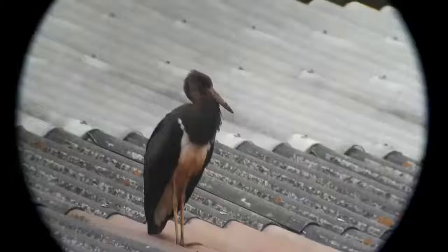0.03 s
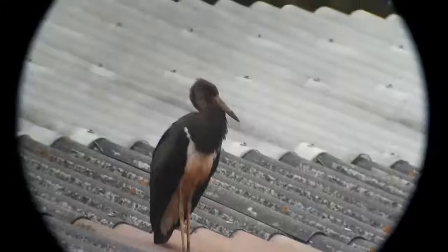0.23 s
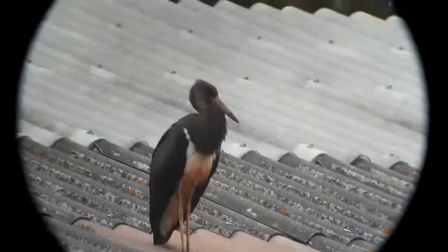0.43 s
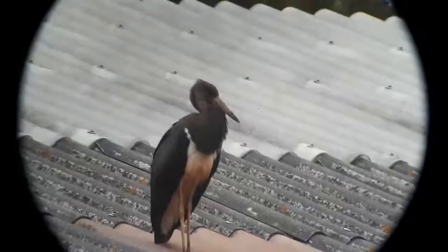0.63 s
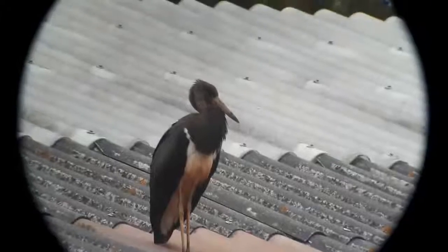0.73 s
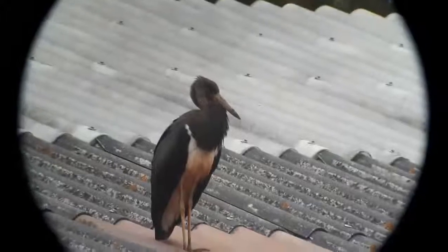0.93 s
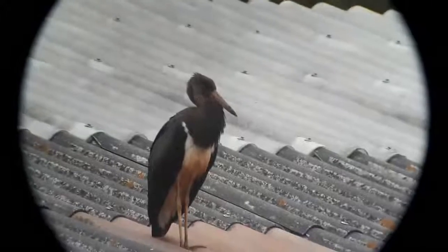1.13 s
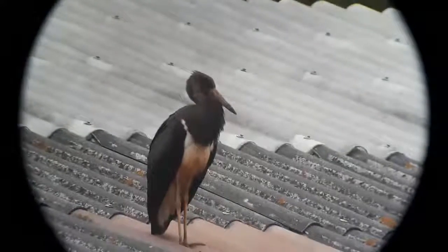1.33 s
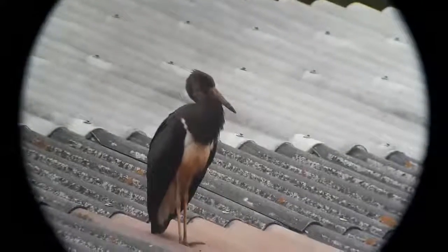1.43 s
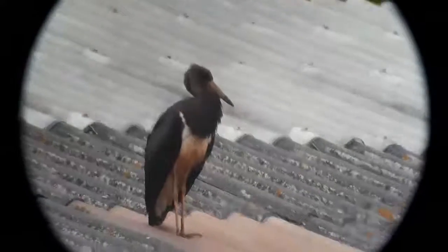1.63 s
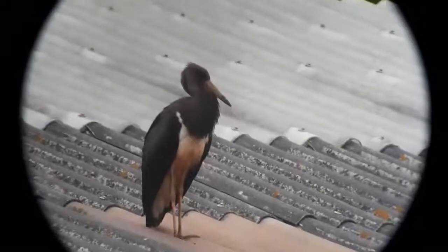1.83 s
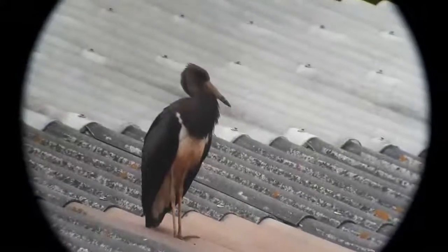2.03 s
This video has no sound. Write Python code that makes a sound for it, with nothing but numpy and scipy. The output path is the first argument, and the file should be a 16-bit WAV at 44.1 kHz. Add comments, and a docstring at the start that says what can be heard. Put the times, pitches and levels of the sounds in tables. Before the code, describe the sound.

A small motor, like a vibrating phone, hums softly close to the microphone, turns briefly buzzy and stops after about a second. Faint outdoor hiss and a distant idling engine lie behind, with soft wind bumps midway.

```python
"""Quiet farmyard with a small motor

A hand-held microphone stands in an even hiss of air, with an engine idling in the distance.
Close by, a small motor, likely a phone's vibrator, spins up, hums for a second and stops.
Soft low bumps of wind or handling reach the microphone midway; one tiny tick comes near the end."""
import sys
import numpy as np
from scipy import signal
from scipy.fft import rfft, irfft
from scipy.io import wavfile
from scipy.ndimage import uniform_filter1d

SR = 44100
rng = np.random.default_rng(int(sys.argv[2]) if len(sys.argv) > 2 else 0)


def inscribe(sig):
    """Save sig as 16-bit PCM at rate SR to the path in sys.argv[1].

    A 1-D sig is mono; a 2-D sig holds one channel per row.
    Samples are clipped to [-1, 1] before scaling.
    """
    pcm = np.round(np.clip(np.atleast_2d(sig).T, -1, 1) * 32767)
    wavfile.write(sys.argv[1], SR, pcm.astype(np.int16))


N = 92610
T = np.arange(N) / SR


def amp(db):
    """Decibels to gain."""
    return 10 ** (np.asarray(db) / 20)


def unit_rms(x):
    """Scales to rms 1."""
    return x / np.sqrt(np.mean(x ** 2) + 1e-20)


def over_time(points):
    """Joins (time_s, value) points by straight lines."""
    return np.interp(T, *np.transpose(points))


def over_frequency(points, hz):
    """Reads (frequency_hz, value) points on a log-frequency axis."""
    point_hz, value = np.transpose(points)
    return np.interp(np.log(hz + 1), np.log(point_hz), value)


def pan(left_minus_right_db):
    """Left and right gains for a level difference."""
    return amp(np.array([[.5], [-.5]]) * left_minus_right_db)


def drift(rate_hz):
    """Smooth random wander of rms 1."""
    hz = np.fft.rfftfreq(N, 1 / SR)
    white = rfft(rng.standard_normal(N))
    return unit_rms(irfft(white * (hz > 0) * np.exp(-(hz / rate_hz) ** 2), N))


# How alike the air is on the two sides of the microphone: frequency_hz, correlation
AIR_CORRELATION = [(60, 0.5), (140, 1), (290, 0.8), (640, 0.58), (1400, 0.08), (3100, 0), (6800, .25),
                   (15000, 0.1)]
# How far the air leans to the left: frequency_hz, left_minus_right_db
AIR_BALANCE = [(60, 1.8), (200, 1.7), (380, 1.2), (700, 6.4), (1300, 5.5), (2400, 5.4), (4400, 4.4),
               (8100, 0.27), (15000, .3)]

def air_noise(spectrum, patch_db=2):
    """Stereo noise of rms 1 in a given colour, with drifting patches, nearly mono in the upper bass."""
    hz = np.fft.rfftfreq(2048, 1 / SR)
    shape = (N // 512 + 5, len(hz))  # frames, bands
    patches = uniform_filter1d(rng.standard_normal(shape), size=7, axis=0)
    patches = unit_rms(uniform_filter1d(patches, size=14, axis=1))
    left, unrelated = rng.standard_normal((2, *shape)) + 1j * rng.standard_normal((2, *shape))
    correlation = np.clip(over_frequency(AIR_CORRELATION, hz), -1, 1)
    right = correlation * left + np.sqrt(1 - correlation ** 2) * unrelated
    colour = amp(over_frequency(spectrum, hz) + patch_db * patches)
    balance = pan(over_frequency(AIR_BALANCE, hz))[:, None]
    frames = np.array([left, right]) * colour * balance
    _, noise = signal.istft(frames.swapaxes(1, 2), nperseg=2048, noverlap=1536)
    return unit_rms(noise[:, :N])


# Low wash, midrange rustle and hiss of the open yard: frequency_hz, relative_density_db
WASH_SPECTRUM = [(20, -45), (33, -21), (48, -8), (75, -10), (125, -6), (190, -11), (240, -10.5),
                 (310, -16.5), (430, -20), (600, -17.5), (830, -16), (1200, -20), (1600, -27.5),
                 (2500, -34.5), (5000, -79)]
RUSTLE_SPECTRUM = [(400, -34), (1000, -11.5), (1450, -8), (1900, 0.5), (2450, -7), (3200, -4.5),
                   (6000, -15), (15000, -52)]
HISS_SPECTRUM = [(300, -11.5), (1200, -4), (1900, -2), (2450, -5), (3100, 0), (4300, 1), (5100, -3),
                 (5700, -12.5), (7600, -11.5), (8400, -20.5), (13000, -17.5), (15500, -20)]
# The breeze swelling the wash: time_s, gain_db
BREEZE_SWELL = [(.18, 3), (.5, 4.5), (.75, 4.5), (.95, 5.5), (1.2, 2.5), (1.48, 4.5), (1.6, -1), (2.1, 1)]
# The rustle dying down: time_s, level_db
RUSTLE_LEVEL = [(.18, -63), (.35, -60), (.95, -61), (1.2, -62.5), (1.5, -62.5), (1.57, -68), (2.1, -69.5)]

def yard_air():
    """All around the microphone: a low wash that swells with the breeze, a rustle and an even hiss."""
    wash = amp(-60 + over_time(BREEZE_SWELL)) * air_noise(WASH_SPECTRUM)
    rustle = amp(over_time(RUSTLE_LEVEL)) * air_noise(RUSTLE_SPECTRUM)
    hiss = amp(-60.5) * air_noise(HISS_SPECTRUM, patch_db=1.3)
    return wash + rustle + hiss


# Engine tones heard from far off: firing_multiple, base_level_db
ENGINE_ORDERS = [(1, -76.5), (2, -60.5), (3, -61.5), (4, -77)]
# Rise and fall of the whole engine at the microphone: time_s, gain_db
ENGINE_SWELL = [(.2, -6), (.35, 4.5), (.44, 0), (.52, -7), (.69, -11), (.77, 2.5), (1.17, -1.5),
                (1.32, -0.5), (1.49, -0.5), (1.57, -4), (1.79, 2), (1.91, 6), (1.98, -4), (2.1, -3.5)]

def distant_engine():
    """An idling engine: only the lowest firing orders carry this far, each fading in and out."""
    firing_hz, jitter, fade_db = 48.92, 0.017, 4
    phase = 2 * np.pi * np.cumsum(firing_hz * (1 + jitter * drift(rate_hz=7.4))) / SR
    orders = np.zeros(N)
    for multiple, db in ENGINE_ORDERS:
        level = amp(db + fade_db * drift(rate_hz=5))
        orders += level * np.sin(multiple * phase + 2 * np.pi * rng.random())
    return pan(2.5) * amp(over_time(ENGINE_SWELL)) * orders


# Turning speed of the motor: time_s, rotation_hz
MOTOR_SPEED = [(.18, 169.7), (.25, 172.2), (.36, 183.2), (.55, 181.8), (.88, 181.8), (.99, 185.1),
               (1.07, 184.7), (1.13, 183.5), (1.38, 181.3)]
# Its hum, close to the microphone: time_s, level_db
HUM_LEVEL = [(.18, -55), (.26, -53.5), (.35, -48), (.41, -43), (.46, -44.5), (.55, -43), (.63, -48.5),
             (.70, -48), (.79, -42), (.92, -43), (1.04, -46), (1.15, -44), (1.27, -43.5), (1.355, -47),
             (1.38, -61), (1.40, -87)]
# Overtones of its casing: rotation_multiple, level_re_hum_db, change_at_full_buzz_db
CASING_OVERTONES = [(2, -28, -1), (3, -32, -0.5), (4, -29.5, 15), (6, -40, 9), (7, -39.5, 12),
                    (9, -43.5, 12)]

def small_motor():
    """Close by, an off-centre weight shakes its casing: a near-pure hum that turns buzzy midway."""
    jitter, hum_wobble_db, overtone_wobble_db = 0.0041, 1.17, 1.5
    buzz_peak_s, rise_s, fall_s = 1, 0.096, 0.23
    rotation_hz = over_time(MOTOR_SPEED) * (1 + jitter * drift(rate_hz=35))
    phase = 2 * np.pi * np.cumsum(rotation_hz) / SR
    buzz_width_s = np.where(T < buzz_peak_s, rise_s, fall_s)
    buzz = np.exp(-((T - buzz_peak_s) / buzz_width_s) ** 2)
    overtones = np.zeros(N)
    for multiple, db, buzz_db in CASING_OVERTONES:
        gain = amp(db + buzz_db * buzz + overtone_wobble_db * drift(rate_hz=18))
        overtones += gain * np.sin(multiple * phase)
    level = np.sqrt(2) * amp(over_time(HUM_LEVEL) + hum_wobble_db * drift(rate_hz=48))
    return level * (pan(1.7) * np.sin(phase) + pan(5.5) * overtones)


# Bumps right on the microphone: centre_s, peak_db, pitch_hz, half_length_s, left_minus_right_db
MICROPHONE_BUMPS = [(0.205, -50, 107, .008, -12), (0.734, -52, 62.1, 0.011, 8),
                    (0.851, -43.5, 99, 0.0096, 9), (0.879, -45.5, 62, 0.014, 9),
                    (0.955, -35, 98.1, 0.0074, 17), (.992, -47, 88, 0.0073, -16),
                    (1.031, -48.5, 63.4, 0.01, -17), (1.087, -53.5, 88, 0.011, -22)]
# Rumble of the gust around them: frequency_hz, relative_density_db
GUST_SPECTRUM = [(20, -32), (45, -5.5), (80, -6), (130, -3), (250, -10.5), (450, -23.5), (900, -24.5),
                 (1400, -26), (2500, -44), (6000, -80)]

def microphone_buffets():
    """Wind or handling at the microphone: soft pressure bumps of a cycle or two, and a brief rumble."""
    bumps = np.zeros((2, N))
    for centre_s, peak_db, pitch_hz, half_length_s, side_db in MICROPHONE_BUMPS:
        t = T - centre_s
        envelope = amp(peak_db) * np.exp(-(t / half_length_s) ** 2)
        bumps -= pan(side_db) * envelope * np.cos(2 * np.pi * pitch_hz * t)
    gust_peak_s, gust_width_s = 0.933, 0.17
    gust = amp(-53.5) * np.exp(-((T - gust_peak_s) / gust_width_s) ** 2)
    return bumps + pan(7) * gust * air_noise(GUST_SPECTRUM)


# Resonances of the tapped plastic: pitch_hz, peak_db, t60_s
PLASTIC_MODES = [(750, -50, .012), (1750, -47, .008), (2800, -51, .006), (4400, -57, .02),
                 (7600, -59, .011)]

def plastic_tick():
    """A light tap on plastic, left of the microphone: a snap and a ring of a few milliseconds."""
    start_s, snap_db, snap_t60_s = 2.015, -58, .008
    t = np.maximum(T - start_s, 0)
    ring = sum(amp(db - 60 * t / t60_s) * np.sin(2 * np.pi * hz * t) for hz, db, t60_s in PLASTIC_MODES)
    snap = (t > 0) * amp(snap_db - 60 * t / snap_t60_s) * rng.standard_normal(N)
    return pan(12) * (ring + snap)


def scene():
    """The farmyard as it reaches the microphone."""
    return yard_air() + distant_engine() + small_motor() + microphone_buffets() + plastic_tick()


def record(dry):
    """The microphone opens after a moment of silence and loses the deepest bass and highest treble."""
    open_s, rise_s = .184, 0.0081
    low_cut_hz, high_cut_hz = 33, 15600
    opened = dry * np.clip((T - open_s) / rise_s, 0, 1)
    hz = np.fft.rfftfreq(N, 1 / SR)
    low_cut = hz ** 4 / np.sqrt(hz ** 8 + low_cut_hz ** 8)
    thinned = irfft(rfft(opened) * low_cut, N) * (T > open_s)
    high_cut = signal.firwin(511, high_cut_hz, window=("kaiser", 9), fs=SR)
    return signal.oaconvolve(thinned, high_cut[None], "same")


dry = scene()
out = record(dry)
inscribe(out)
```